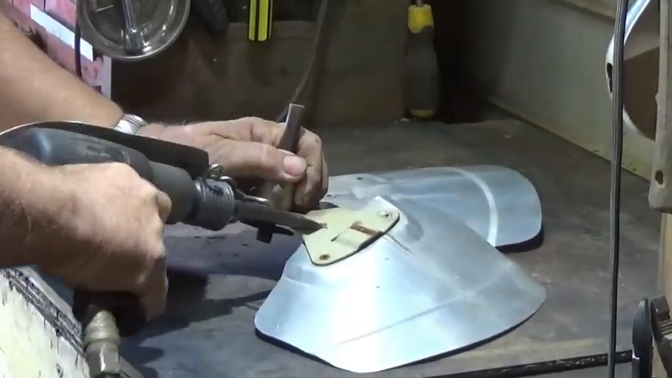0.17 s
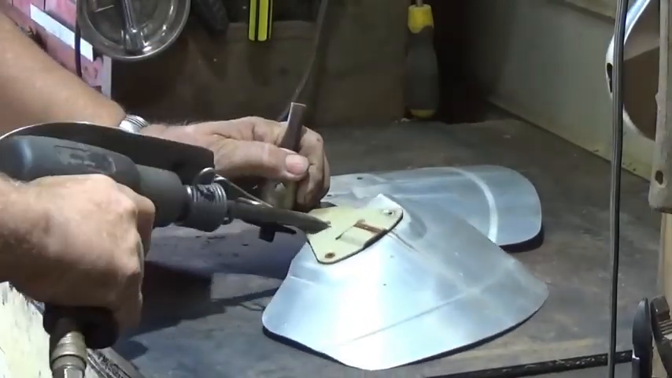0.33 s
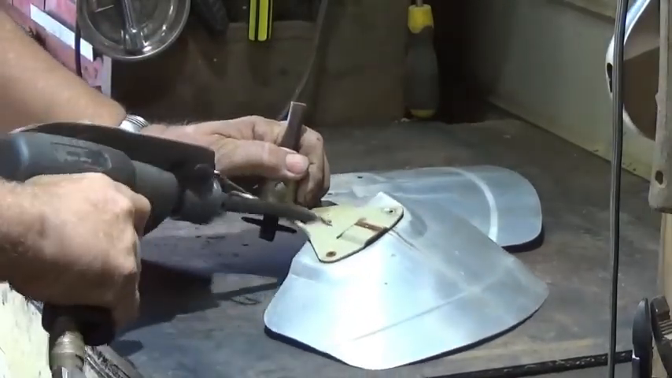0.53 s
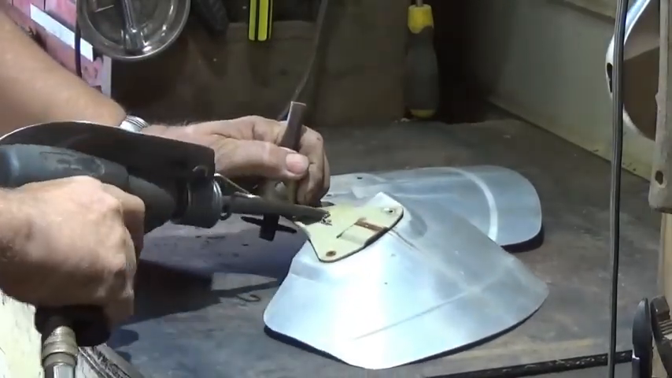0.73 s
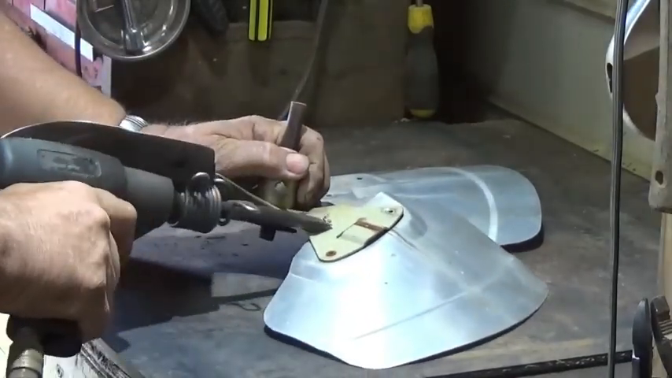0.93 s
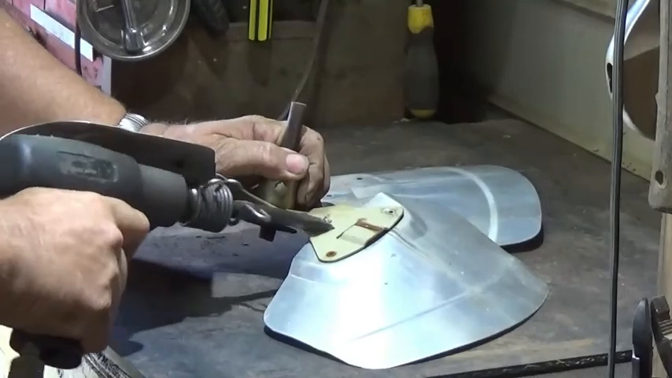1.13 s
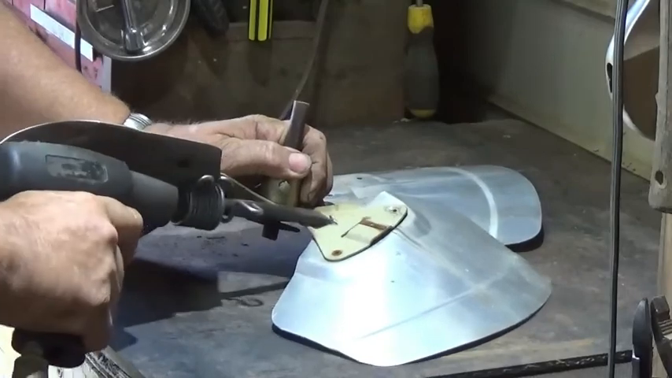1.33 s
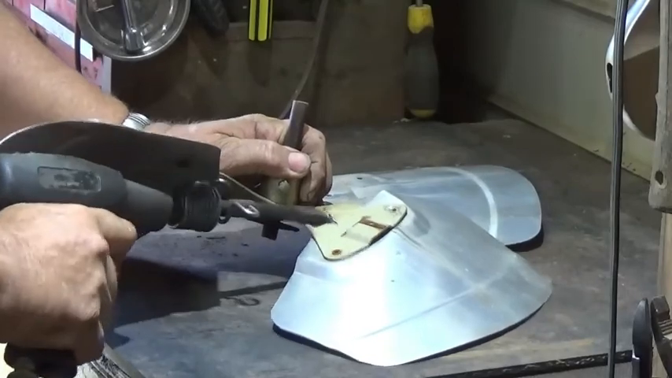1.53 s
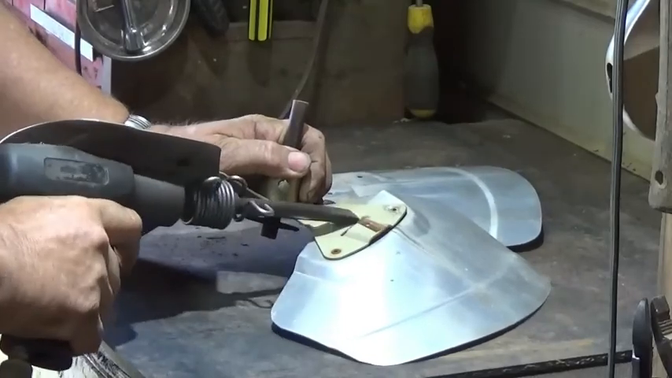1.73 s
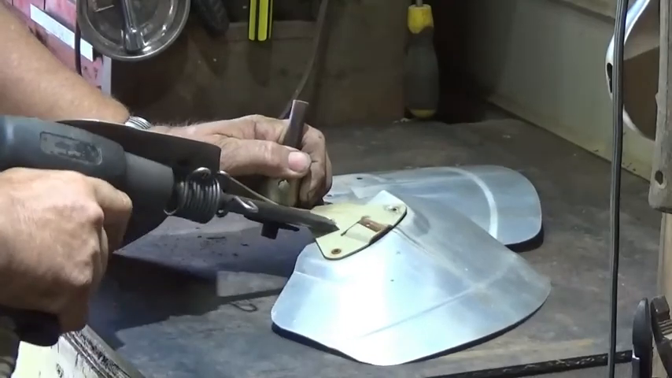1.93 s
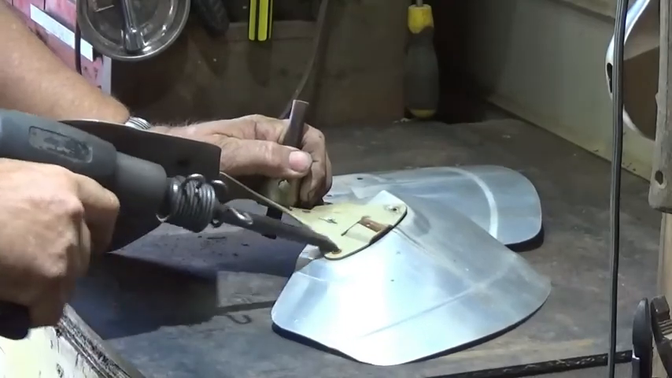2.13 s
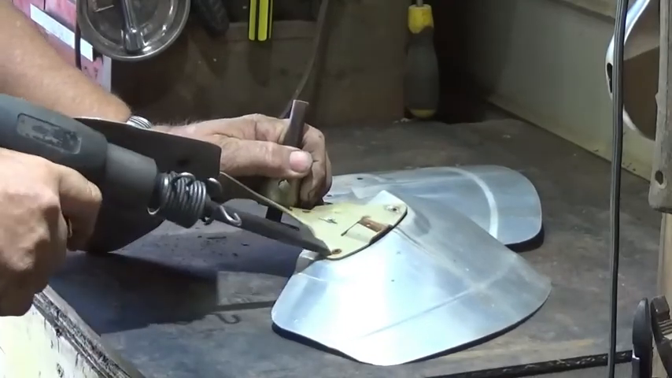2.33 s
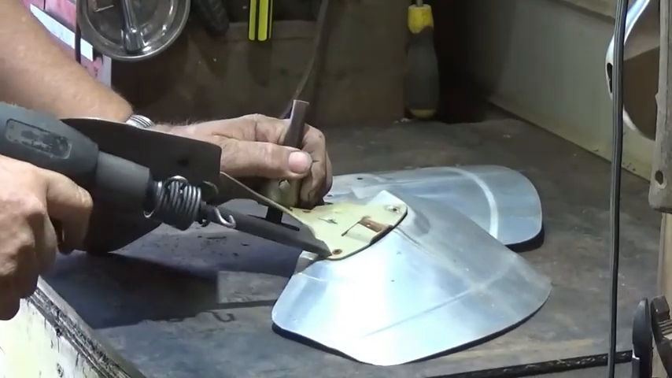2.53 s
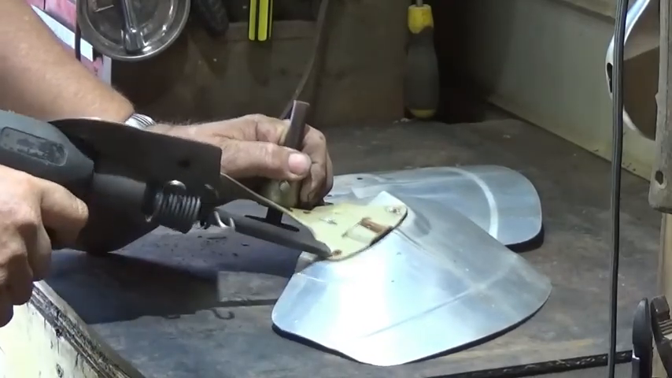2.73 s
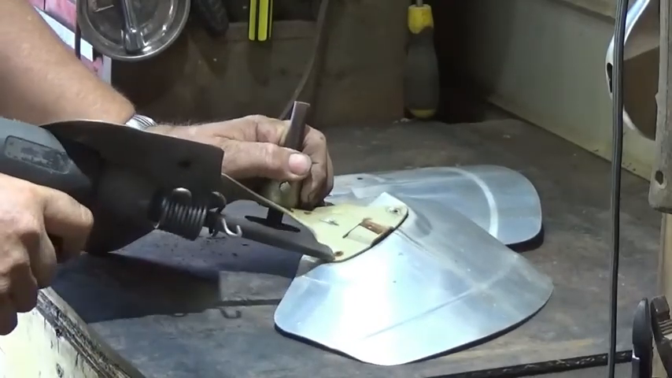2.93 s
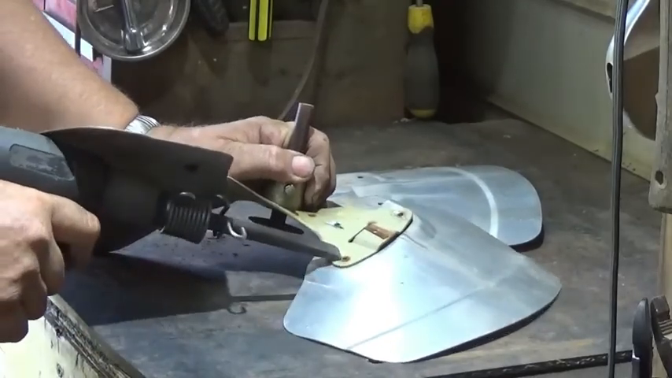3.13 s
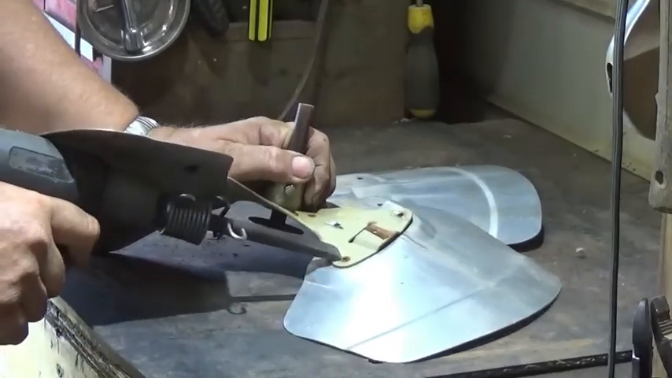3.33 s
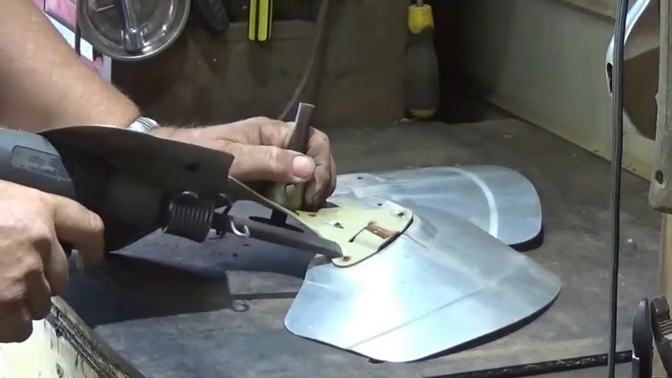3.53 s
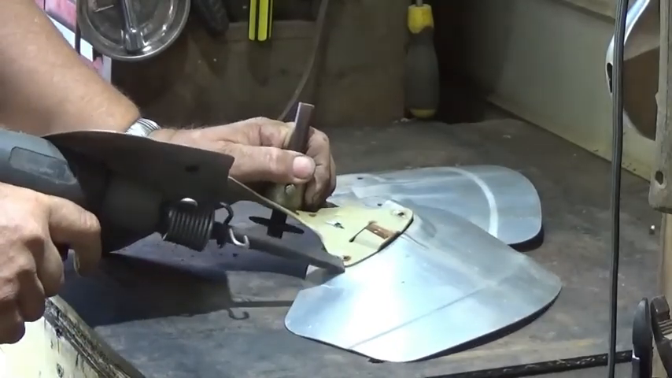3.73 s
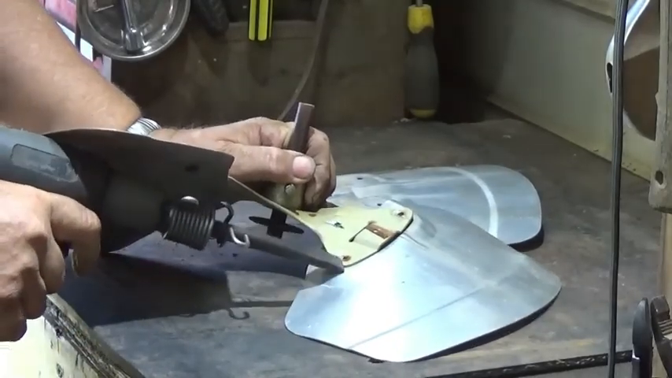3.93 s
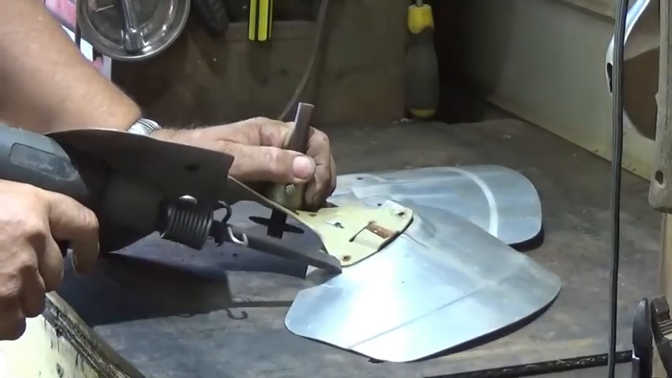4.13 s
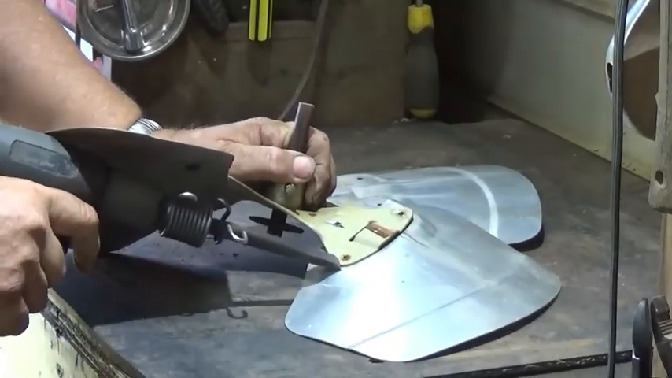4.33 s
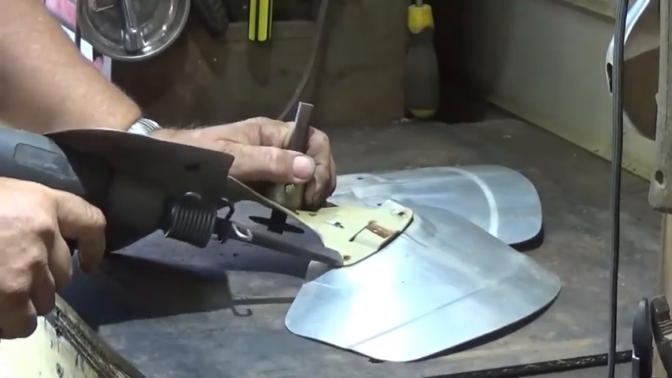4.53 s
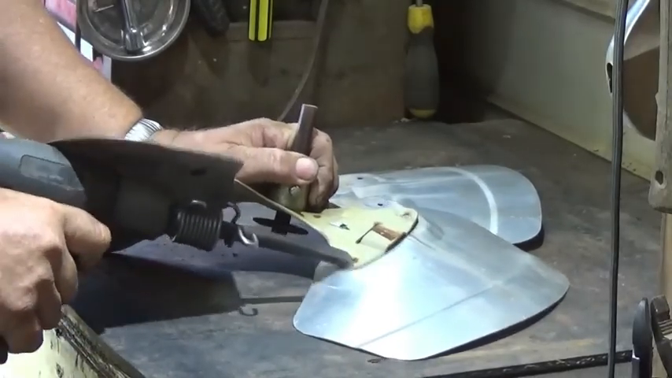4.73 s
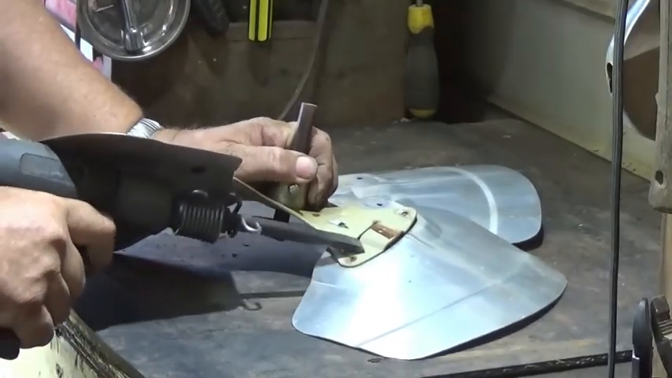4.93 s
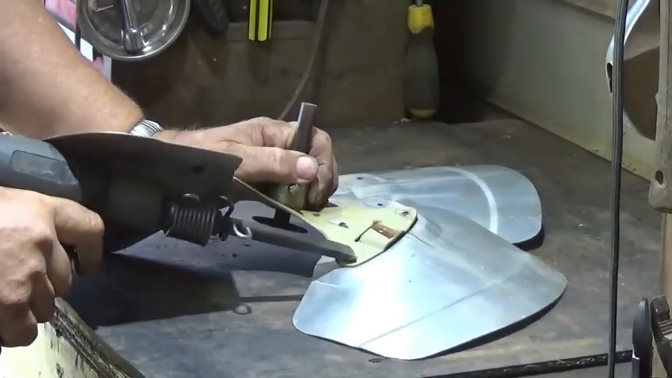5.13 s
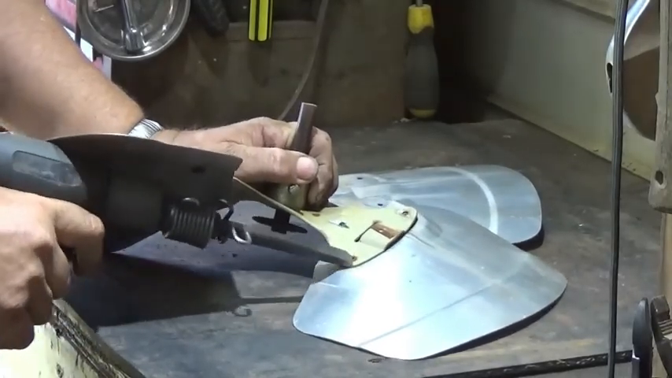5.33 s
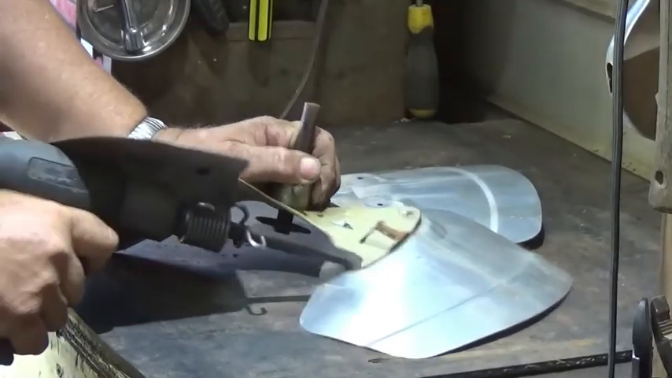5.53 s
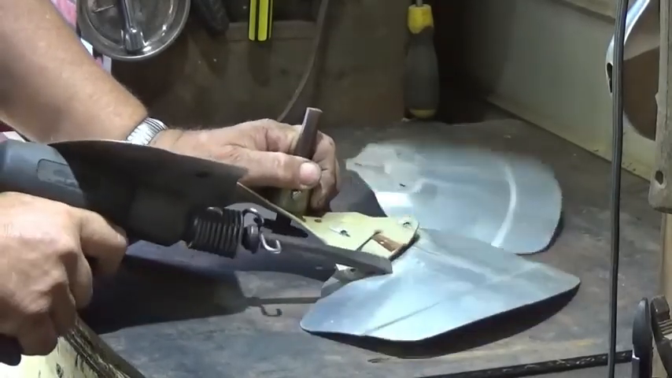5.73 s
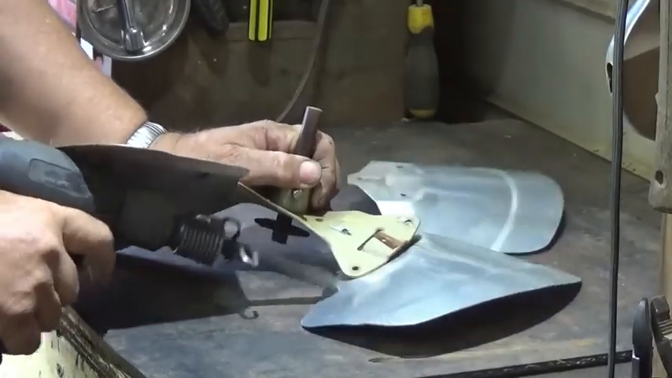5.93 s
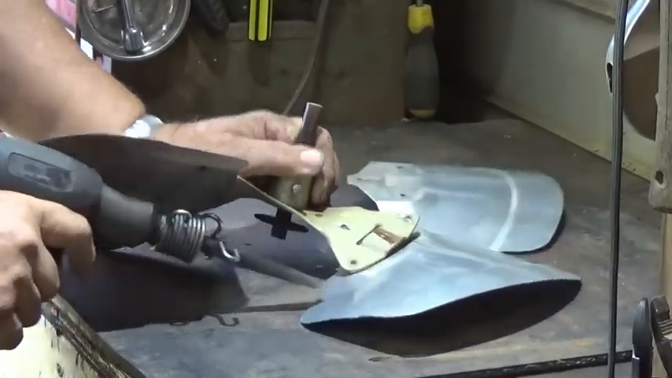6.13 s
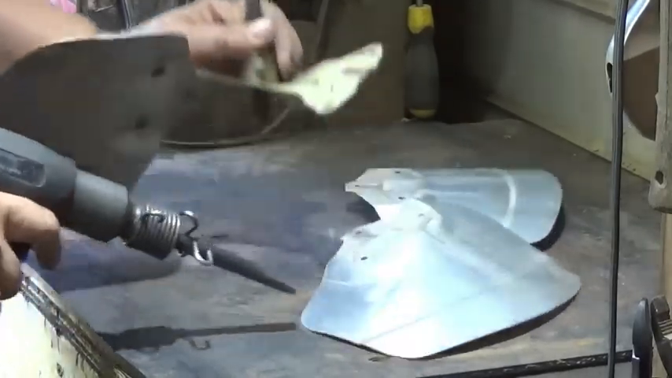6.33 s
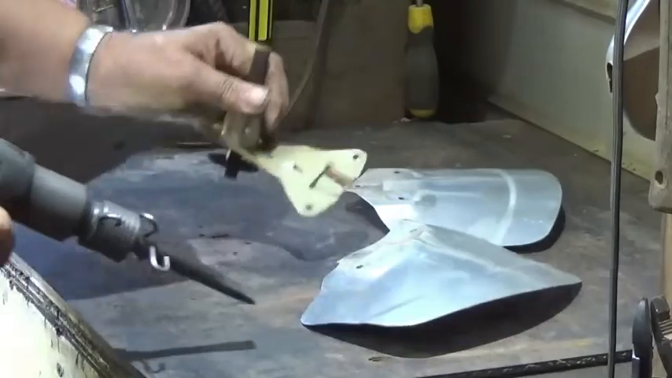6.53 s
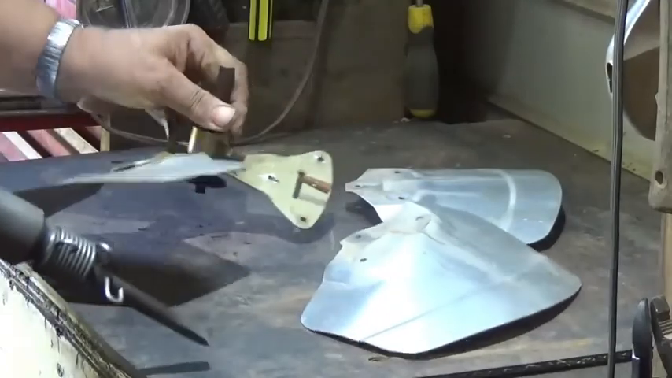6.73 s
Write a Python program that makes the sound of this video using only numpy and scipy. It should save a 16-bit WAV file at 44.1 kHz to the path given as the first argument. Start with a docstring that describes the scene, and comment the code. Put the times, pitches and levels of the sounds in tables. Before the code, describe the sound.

In a small workshop, an air chisel fires two quick bursts, then two more, each a rapid string of hard metallic cracks with a rattling blade and a little hissing air. After a pause with faint clicks and a tiny ping, three follow close together, then two spaced ones. Tip taps and gritty scrapes fill the gaps, and the loosened sheet metal clatters at the end. The microphone is close, with short room echoes over a faint hush.

```python
"""Nine short hammering bursts: an air chisel cuts the rivets off a sheet-metal fan blade on a steel workbench.
Each burst is a puff of air, a short stroke and three to five full piston blows, made of decaying noise,
that crack the chisel, rattle the blade and thump the bench; their forces also ring a bank of metal modes.
Between bursts the tip is set down (clicks and short rings) and slid along (gritty noise); at the end the
freed blade clatters. A small workshop answers with close echoes and a short tail, over a faint hush."""
import sys
import numpy as np
from scipy import signal
from scipy.fft import rfft, irfft
from scipy.io import wavfile
from scipy.ndimage import uniform_filter1d

SR = 44100
rng = np.random.default_rng(int(sys.argv[2]) if len(sys.argv) > 2 else 0)


def pcm_store(signal):
    """Save signal as 16-bit PCM."""
    levels = np.round(np.clip(np.atleast_2d(signal), -1, 1) * 32767)
    wavfile.write(sys.argv[1], SR, levels.astype(np.int16).T)


N = 298557
T = np.arange(SR // 2) / SR  # time within one event, s
HZ = np.fft.rfftfreq(N, 1 / SR)
EDGE_HZ = 11120  # upper band limit of the microphone signal

# Trigger pulls at the bench. All levels are relative, before the layers are coloured and mixed. Columns:
# valve_opens_s, short_stroke_s, first_full_blow_s, last_blow_s, chisel_crack_db, blade_rattle_db,
# bench_thump_db, last_blow_extra_crack_db, air_db, blade_bounce_db, piston_kick_db
TRIGGER_PULLS = [(0.099, 0.117, 0.14, 0.2160, -14, -20, -35.5, 1, -35.5, -26, -43.5),
                 (0.390, 0.4056, 0.44, 0.4904, -12.5, -22.5, -33.5, -1, -34.5, -30.5, -29.5),
                 (1.074, 1.1000, 1.1131, 1.1942, -14, -20.5, -36, -0.5, -31.5, -22.5, -40.5),
                 (1.449, 1.4672, 1.4965, 1.5760, -14.5, -24.5, -36.5, -10, -30.5, -32, -29),
                 (2.631, 2.6535, 2.674, 2.7630, -14.5, -27.5, -34, 2, -36, -22.5, -51),
                 (2.938, 2.9552, 2.9745, 3.0500, -13.5, -23.5, -34, 4, -31, -18, -38.5),
                 (3.294, 3.3118, 3.343, 3.4225, -14, -24, -35, -6.5, -32, -41, -27),
                 (4.62, 4.638, 4.6553, 4.7572, -14, -22, -34, 4.5, -32, -24.5, -39),
                 (5.396, 5.4164, 5.4380, 5.5402, -13.5, -20.5, -34.5, 3.5, -34, -18.5, -36.5)]
# Spectrum shared by crack, rattle and thump: pitch_hz, level_db (relative, per Hz)
HAMMER_COLOUR = [(15, -64), (25, -31.5), (178, -8), (212, -8), (254, -4), (327, -6), (412, -5.5), (907, -3),
                 (1230, -3.5), (1330, -6.5), (1900, -4.5), (3590, -6), (6120, -4.5), (9200, -2),
                 (11000, -9), (14300, -31), (22000, -120)]
SHANK_DB, SHANK_T60_S = -19.5, .02  # ring of the shank at an ordinary blow
SHANK_MODES = [(2750, -13.5), (4600, -9.5), (5950, -2.5), (9000, -5.5)]  # pitch_hz, level_db


def hammer():
    """Each blow cracks the chisel, rattles the blade and thumps the bench; the blade bounces on after the last."""
    crack, rattle, thump, shank = np.zeros((4, N))
    for opens, short, first, last, *force_db, last_db, _, bounce_db, kick_db in TRIGGER_PULLS:
        times, stroke_db = strokes(short, first, last, last_db)
        blow_db = stroke_db + [*force_db, SHANK_DB]
        for s, (crack_db, rattle_db, thump_db, shank_db) in zip(times, blow_db):
            snap = chatter(0.00071, .0075, 9.6) + .5 * chatter(0.0044, 0.03, 0.97)
            add(crack, s, amp(crack_db) * tint(snap, 0.001, 1500, 6900))
            add(rattle, s, amp(rattle_db) * tint(chatter(0.0061, 0.019, 1.6), 0.0036, 700, 3600))
            add(thump, s, amp(thump_db) * chatter(.0015, 0.03, 0.4))
            # pressed on the rivet the shank rings only briefly, at a pitch that shifts with each contact
            for hz, db in SHANK_MODES:
                contact = chatter(0.00024, 0.021, 0.81)
                contact_hz = hz * (1 + 0.072 * rng.standard_normal())
                add(shank, s, amp(shank_db + db) * ring(contact, contact_hz, SHANK_T60_S))
        bounce = amp(bounce_db) * chatter(0.017, 0.022, 6.0)
        add(rattle, last + 0.0088, 2.25 * bounce)
        add(crack, last + 0.02, 1.4 * bounce)
        add(thump, last + .008, 0.13 * bounce)
        add(thump, opens + .014, amp(kick_db) * chatter(0.00099, 0.016, 1.0))
    dense = colour(crack, HAMMER_COLOUR, lo_hz=3200)
    dense += colour(rattle, HAMMER_COLOUR, 600, 3300)
    dense += colour(thump, HAMMER_COLOUR, hi_hz=720)
    force = np.array([amp(6.5) * thump, amp(-0.5) * rattle, amp(-13.5) * crack])  # on low, middle, high modes
    return amp(-1) * dense + shank, force


PISTON_HZ = 38  # nominal rate of full blows while the trigger is held
# Strokes against the middle of a burst: crack_db, rattle_db, thump_db, shank_ring_db
SHORT_DB = [-1.5, -6, -2, -4]
# The same columns for the first full blow, which bites into the rivet
FIRST_BITE_DB = [1.8, 5.5, 2, 4.1]
# no two strokes are quite alike: random scatter of their time and strength
STROKE_JITTER_S, STROKE_SCATTER_DB = .0003, 0.52


def strokes(short, first, last, last_db):
    """A short stroke, then even blows until the trigger is let go: times, rows of (crack, rattle, thump, shank) dB."""
    count = round((last - first) * PISTON_HZ) + 1
    times = np.append(short, np.linspace(first, last, count))
    db = STROKE_SCATTER_DB * rng.standard_normal((count + 1, 4))
    db[0] += SHORT_DB
    db[1] += FIRST_BITE_DB
    db[-1, 0] += last_db
    return times + STROKE_JITTER_S * rng.standard_normal(count + 1), db


# Modes of blade, bracket and chisel: pitch_hz, first_place_db, second_place_db, third_place_db
METAL_MODES = [(213, -15.5, -15, -15.5), (335.1, -12.5, -10.5, -12), (368, -20, -25, -20.5),
               (511, -20, -20.5, -13.5), (711, -9.5, -11, -15.5), (901.4, -11.5, -16.5, -10),
               (981, -8.5, -14.5, -6), (1075, -13.5, -21, -16), (1202, -5, -19, -21.5),
               (1434, -19.5, -23, -7.5), (1480, -23, -8.5, -6.5), (1644, -30.5, -20, -9),
               (1840, -24, -17, -6.5), (1840, -16.5, -14.5, -19.5), (1940, -18.5, -23, -21.5),
               (2755, -17, -14.5, -4), (4020, -13.5, -17, -17), (4100, -13, -21, -5.5),
               (4460, -5, -15.5, -12), (4530, -18.5, -12.5, -8.5), (4700, -7, -18.5, -18.5),
               (5100, -17.5, -10, -12.5), (5650, -7.5, -14.5, -12), (5710, -7, -18, -10),
               (6070, -15, -14.5, -8), (6158, -14, -8.5, -7.5), (6390, -17, -6.5, -11.5),
               (6250, -6, -11.5, -8.5), (7600, -11, -10.5, -11), (9500, -6.5, -13, -1.5)]
# When the tip moves to its next place on the blade: start_s
TIP_MOVES = [2.4, 4.2]
# How freely the metal rings at each of the three places: level_db
PLACE_RING_DB = [-4, -7.5, -7.5]
RING_T60_AT_1KHZ_S = .15  # higher modes die sooner, lower ones later


def metal(low, middle, high):
    """The modes ring, each fed by the force in its own range; where the tip sits decides which ones wake."""
    t = np.arange(N) / SR
    place, out = np.searchsorted(TIP_MOVES, t), np.zeros(N)
    knots = np.arange(0, t[-1], .04)
    for hz, *dbs in METAL_MODES:
        force = low if hz < 600 else middle if hz < 3000 else high
        drive = force * amp(dbs)[place]
        # the shifting pressure of tip and hand bends each mode slightly
        bend = np.interp(t, knots, rng.standard_normal(len(knots)))
        bent_hz = hz + .22 * np.sqrt(hz) * bend
        turn = np.exp(2j * np.pi * np.cumsum(bent_hz) / SR)
        t60 = RING_T60_AT_1KHZ_S * np.sqrt(1000 / hz)
        r = 1000 ** (-1 / (t60 * SR))
        # shift the mode to 0 Hz, let it decay there, shift it back
        envelope = signal.lfilter([1], [1, -r], drive * turn.conj() + 1e-18)
        out += 2 * np.sqrt(1 - r) * (turn * envelope).real
    return out * amp(PLACE_RING_DB)[place]


# Spectrum of the escaping air: pitch_hz, level_db (relative, per Hz)
AIR_COLOUR = [(100, -14.5), (700, -1.5), (1300, -8), (1900, 6.5), (3000, -7.5), (4900, 6), (7000, -0.5),
              (9000, 0), (11000, -4.5)]


def air():
    """The valve hisses: turbulent noise that swells from the pull of the trigger and shuts at the last blow."""
    out = np.zeros(N)
    for opens, _, _, last, *_, air_db, _, _ in TRIGGER_PULLS:
        t = T[:int((last - opens) * SR)]
        swell = (1.15 - np.exp(-t / 0.012)) * signal.windows.tukey(len(t), .03)
        add(out, opens, amp(air_db) * grit(len(t), 1.6) * swell)
    return colour(out, AIR_COLOUR)


# The tip and loose metal knocking, relative levels before colour and mix. Columns:
# start_s, bright_click_db, dull_knock_db, plate_pitch_hz, plate_ring_db, chisel_ring_db
KNOCKS = [(0.001, -44.5, -42.5, 1227, -45.5, -56), (0.893, -53.5, -47, 1503, -49.5, -61),
          (0.9938, -38.5, -51, 1486, -54, -32.5), (1.663, -26.5, -55, 1993, -42, -33),
          (1.852, -68, -63, 914, -53, -74), (1.9952, -50.5, -77, 926, -68, -47),
          (2.073, -58, -47, 1216, -50, -60), (2.111, -57, -56.5, 1520, -52.5, -58),
          (2.29, -48.5, -44, 1174, -47, -58), (2.911, -29.5, -56, 1915, -39, -37),
          (3.685, -69, -61, 1050, -56.5, -65), (3.9084, -38.5, -50, 1583, -40.5, -24),
          (4.471, -47, -38, 1475, -49, -52), (4.905, -56.5, -42.5, 1455, -42, -58),
          (5.1496, -39.5, -33.5, 1460, -33, -44), (5.161, -23, -35.5, 1430, -29.5, -24),
          (5.29, -51, -41, 987, -37.5, -55), (5.352, -30, -33, 980, -49, -43),
          (5.654, -28.5, -38.5, 1990, -44, -30), (5.713, -32, -39, 1887, -34, -34),
          (5.735, -27.5, -40, 1880, -33, -30), (5.777, -36, -38, 1830, -50, -40),
          (5.853, -39, -54, 1010, -46, -44), (5.883, -24.5, -36.5, 1130, -42, -18),
          (5.924, -25.5, -35.5, 1114, -40.5, -21.5), (6.16, -55, -65, 1246, -63.5, -55),
          (6.176, -48, -59.5, 1930, -63, -53.5), (6.582, -67.5, -58.5, 1260, -53, -69.5)]
# Spectrum shared by click and knock: pitch_hz, level_db (relative, per Hz)
TAP_COLOUR = [(60, -17.5), (200, -3.5), (500, -16), (1000, 2), (1600, -3), (2400, -3.5), (3500, 0.5),
              (7000, 1), (11000, -5)]
TIP_HZ = 6740  # touched lightly, the chisel rings at this pitch
# A cluster of plate modes: ratio to the plate pitch, level_db
PLATE_MODES = [(1, 0), (.966, -8), (1.09, -9), (.87, -11), (.68, -8), (1.45, -12), (1.85, -10), (2.3, -12)]
PING_S = 2.191
# The retaining spring, which pings once at PING_S: pitch_hz, level_db, t60_s
SPRING_MODES = [(6480, -46, .12), (5870, -57, .15), (10050, -64, .1)]


def taps():
    """Light knocks: a click, a dull body, a low ring of the plate that is touched and a high ring of the chisel."""
    click, knock, rings = np.zeros((3, N))
    for s, click_db, knock_db, plate_hz, plate_db, tip_db in KNOCKS:
        add(click, s, amp(click_db) * chatter(0.00056, 0.0093, 3))
        add(knock, s, amp(knock_db) * chatter(0.0051, 0.017, 1.8))
        # the plate modes beat and die quickly under the hand
        for ratio, db in PLATE_MODES:
            mode = np.sin(2 * np.pi * (plate_hz * ratio * T + rng.random())) * np.exp(-T / .014)
            add(rings, s, amp(plate_db + db) * mode)
        add(rings, s, amp(tip_db) * ring(chatter(0.00066, 0.0034, 0.9), TIP_HZ, 0.01))
    for hz, db, t60 in SPRING_MODES:
        envelope = amp(db - 60 * T / t60) * (1 - np.exp(-T / .0006))
        add(rings, PING_S, envelope * np.sin(2 * np.pi * hz * T))
    dense = colour(click, TAP_COLOUR, lo_hz=3000)
    dense += amp(-1.5) * colour(knock, TAP_COLOUR, hi_hz=2840)
    force = np.array([amp(-5) * knock, knock, amp(-7) * click])  # on low, middle, high modes
    return dense + rings, force


# Metal sliding over metal: start_s, length_s, hardest_press (share of the length), level_db there
# (relative, before colour and mix)
RUBS = [(0.681, 0.13, 0.26, -56), (1.94, 0.26, 0.5, -57.5), (2.467, 0.17, 0.33, -56), (3.527, .2, .22, -50),
        (4.278, .22, 0.26, -63), (4.921, 0.12, 0.25, -52), (5.305, 0.13, 0.59, -50),
        (5.674, 0.16, 0.35, -38), (5.791, 0.108, 0.8, -42), (6.176, 0.29, 0.42, -63.5),
        (6.46, 0.3, 0.41, -60)]
# Spectrum of the rubbing: pitch_hz, level_db (relative, per Hz)
SLIDE_COLOUR = [(59, -57), (100, -9), (215, -9.5), (404, -14.5), (611, 0), (701, -7.5), (1100, -8.5),
                (1260, -7.5), (1630, -9.5), (8190, -11.5), (11000, -19.5), (14300, -55.5), (22000, -120)]
SLIDE_EDGE_DB = -13  # pressure at either end against the hardest, before a short fade


def slides():
    """Gritty rubbing that swells and eases with the pressure of the hand and faintly rings the metal."""
    level = np.zeros(N)
    for start, length, hardest, db in RUBS:
        u = np.linspace(0, 1, int(length * SR))
        easing = np.interp(u, [0, np.clip(hardest, 0, 1), 1], [1, 0, 1])
        fade = signal.windows.tukey(len(u), .15)
        add(level, start, amp(db + SLIDE_EDGE_DB * easing) * fade)
    rub = level * grit(N, 2.2)
    force = np.array([amp(-5.5) * rub, amp(-7.0) * rub, amp(-8) * rub])  # on low, middle, high modes
    return amp(-5.0) * colour(rub, SLIDE_COLOUR), force


# How long the small workshop rings on: pitch_hz, t60_s
WORKSHOP_T60 = [(60, 0.46), (250, 0.36), (1000, 0.28), (3000, 0.26), (6000, 0.23), (11000, 0.14)]


def workshop(x):
    """Close echoes from the side walls of the bench widen the centred direct sound; a short tail follows."""
    hz, t, z = signal.stft(rng.standard_normal((2, SR)), SR, nperseg=256)
    z *= amp(-60 * t / read(WORKSHOP_T60, hz)[:, None]) * (1 - np.exp(-t / 0.0029))
    tail = signal.istft(z, SR, nperseg=256)[1][:, :len(T)]
    echo = amp(-8.5) * tail / np.linalg.norm(tail[0])
    # sparse close echoes, from 0.8 ms after the direct sound
    sparse = rng.random(len(T)) < .08
    near = rng.standard_normal(len(T)) * sparse * np.exp(-T / .006) * (T > .0008)
    echo[1] += amp(-4.5) * near / np.linalg.norm(near)
    mid, side = signal.fftconvolve(x[None], echo, axes=1)[:, :N]
    # the echoes spread most in the middle range
    side = signal.lfilter(*signal.butter(1, [420, 10000], "band", fs=SR), side)
    return x + mid + 0.49 * np.array([side, -side])


# Spectrum of the steady background: pitch_hz, level_db (relative, per Hz)
HUSH_COLOUR = [(12, -58), (20, -21.5), (38, -13), (59, -6.5), (81, -11.5), (295, -11), (395, -17.5),
               (572, -15), (785, -20.5), (3180, -20.5), (11000, -30), (14300, -65), (22000, -120)]
HUSH_DB = -73.5


def hush():
    """A faint steady hush: coloured noise, with a weaker independent part opposed in left and right."""
    mid, side = colour(rng.standard_normal((2, N)), HUSH_COLOUR)
    return amp(HUSH_DB) * (mid + np.array([[.4], [-.4]]) * side)


def amp(db):
    """Decibels to gain."""
    return 10 ** (np.asarray(db) / 20)


def read(points, hz):
    """A table read on a log-frequency axis."""
    f, value = np.transpose(points)
    return np.interp(np.log(hz + 1), np.log(f + 1), value)


def add(mix, s, sound):
    """Lays a sound into the mix at time s."""
    part = mix[max(round(s * SR), 0):][:len(sound)]
    part += sound[:len(part)]


def colour(x, points, lo_hz=1, hi_hz=30000):
    """Gives white sound one band of a spectrum, keeping its power and its sharp attacks."""
    band = 1 / np.sqrt((1 + (lo_hz / (HZ + 1)) ** 8) * (1 + (HZ / hi_hz) ** 8))
    gain = amp(read(points, HZ)) * band
    gain /= np.sqrt(np.mean(gain ** 2 * (HZ < EDGE_HZ)))
    # folding the cepstrum makes the filter minimum-phase: nothing sounds before the attack
    cepstrum = irfft(np.log(gain + 1e-5), N)
    cepstrum[1:N // 2] *= 2
    cepstrum[N // 2:] = 0
    response = irfft(np.exp(rfft(cepstrum)), N)[:len(T)]
    return irfft(rfft(x, 2 * N) * rfft(response, 2 * N))[..., :N]


def grit(size, spread_db):
    """Noise of unit power made of uneven micro-contacts about a millisecond long."""
    lumps = uniform_filter1d(rng.standard_normal(size), size=49) * np.sqrt(49)
    x = rng.standard_normal(size) * amp(spread_db * lumps)
    return x / x.std()


def chatter(rise, fall, spread_db):
    """A blow and a dying swarm of tiny rebounds (rise, fall in s); their total energy is set by the blow."""
    shape = (1 - np.exp(-T / rise)) * np.exp(-T / fall)
    x = grit(len(T), spread_db) * shape
    return x * np.linalg.norm(shape) / np.linalg.norm(x)


def tint(x, contact_s, lo_hz, hi_hz):
    """No two contacts are alike: quick re-strikes give each blow its own colour, at the same energy in its band."""
    strikes = rng.standard_normal(len(T)) * np.exp(-T / contact_s)
    strikes[0] = np.linalg.norm(strikes)
    hz = np.fft.rfftfreq(len(T), 1 / SR)
    tinted = rfft(x) * rfft(strikes)
    band = (hz > lo_hz) & (hz < hi_hz)
    band_gain = np.sqrt(np.mean(abs(tinted[band]) ** 2))
    return irfft(tinted, len(T)) * np.linalg.norm(x) / band_gain


def ring(x, hz, t60):
    """One mode, a two-pole resonance that falls 60 dB in t60 seconds; white input keeps its power."""
    r = 1000 ** (-1 / (t60 * SR))
    poles = [1, -2 * r * np.cos(2 * np.pi * hz / SR), r * r]
    return np.sqrt(1 - r) * signal.lfilter([1, 0, -1], poles, x)


def scene():
    """All the metalwork in the room, over a faint steady hush."""
    blows, blow_force = hammer()
    knocks, knock_force = taps()
    rub, rub_force = slides()
    ringing = metal(*(blow_force + knock_force + rub_force))
    work = blows + knocks + rub + air() + ringing
    return workshop(work) + hush()


CEILING = .68  # level that the rounded peaks approach, full scale = 1


def record(dry):
    """At the microphone the loudest cracks are rounded off; then a steep band limit."""
    rounded = CEILING * np.tanh(dry / CEILING)
    lowpass = signal.firwin(401, EDGE_HZ, window=("kaiser", 7), fs=SR)
    return signal.oaconvolve(rounded, lowpass[None], "same")


dry = scene()
out = record(dry)
pcm_store(out)
```